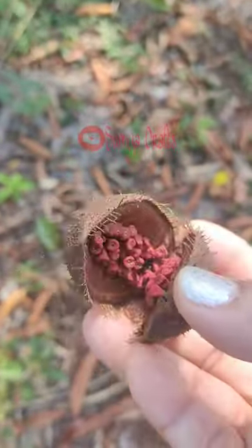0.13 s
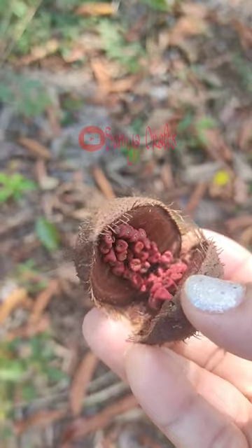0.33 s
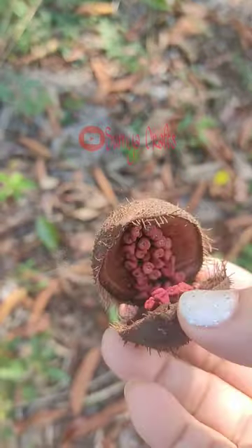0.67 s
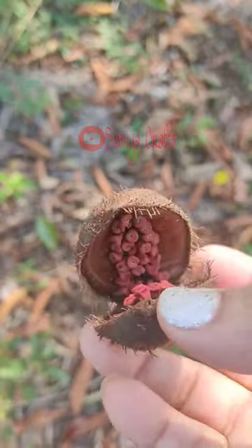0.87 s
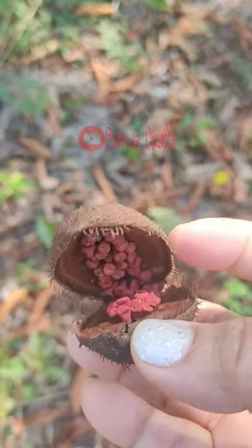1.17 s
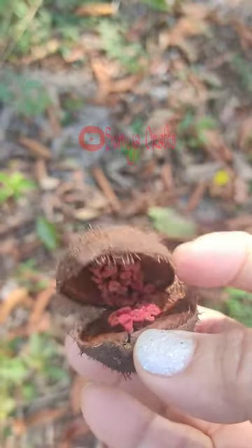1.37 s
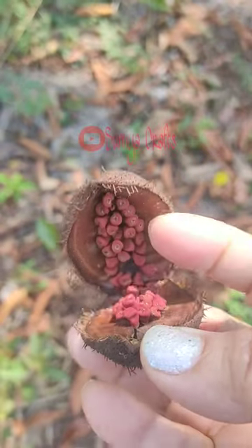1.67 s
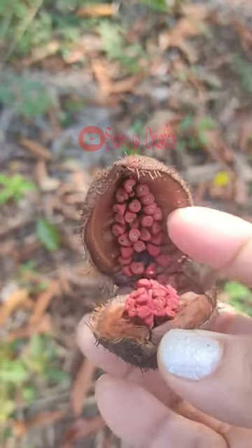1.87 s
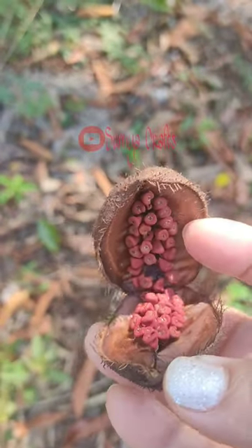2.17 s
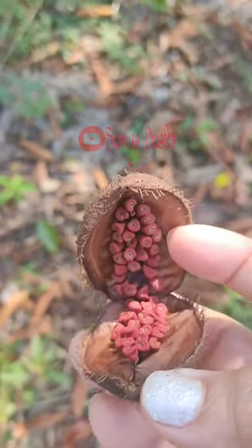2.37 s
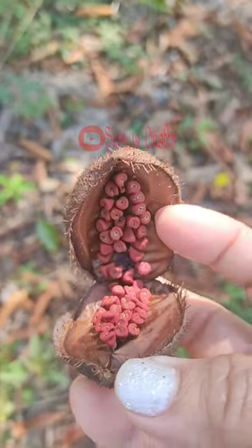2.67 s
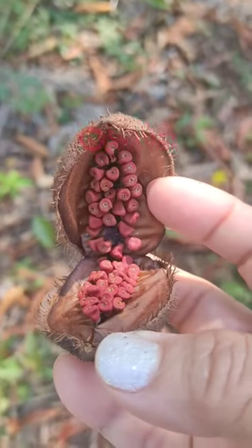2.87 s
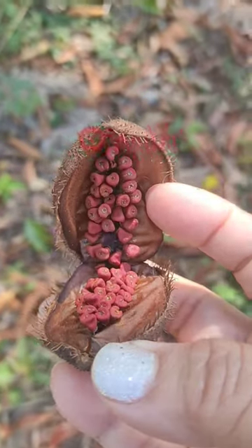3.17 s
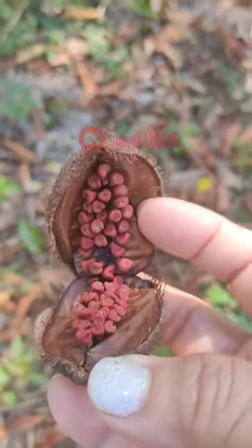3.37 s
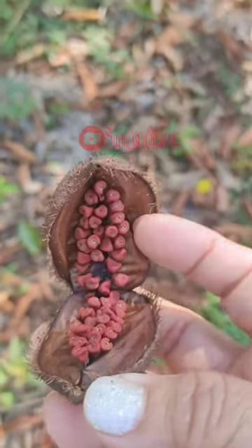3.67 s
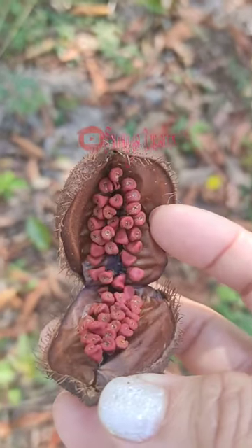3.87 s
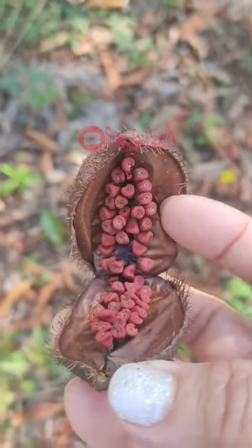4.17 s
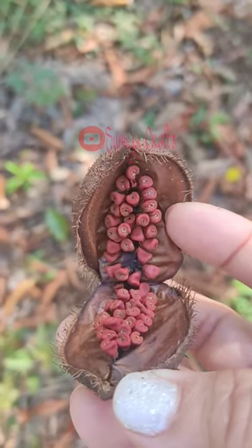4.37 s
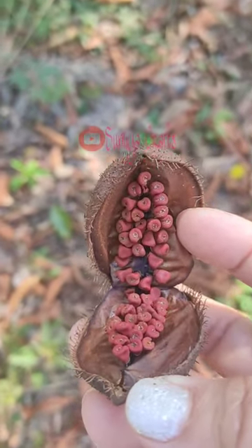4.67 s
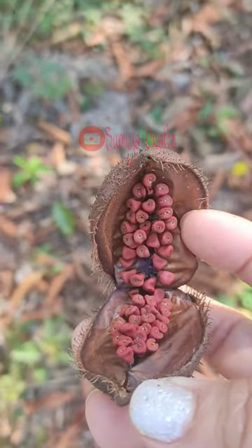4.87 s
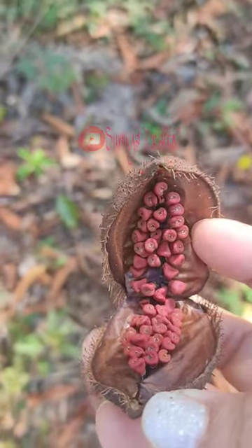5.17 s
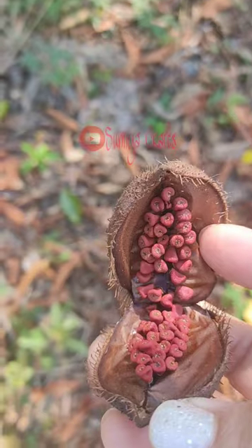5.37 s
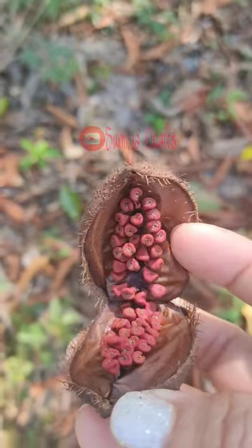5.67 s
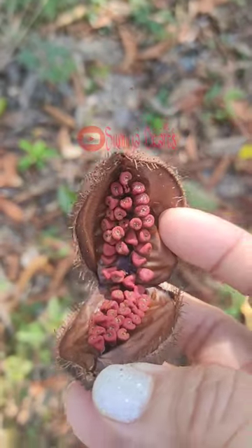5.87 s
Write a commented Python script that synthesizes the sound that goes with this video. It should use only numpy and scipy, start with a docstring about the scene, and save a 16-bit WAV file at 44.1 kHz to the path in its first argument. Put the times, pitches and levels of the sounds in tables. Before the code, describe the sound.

A steady, high cricket trill and a soft hiss fill an outdoor spot. Right by the microphone, a dry seed pod is pulled apart by hand, its shell crackling and scraping in irregular bursts that peak in one sharp crack. In the second half there is only light rubbing and the odd click. A far cicada buzzes faintly, and a bird pipes once, thinly, about halfway through.

```python
"""Outdoors, fingers pry open a dry, bristly seed pod close to a phone's two microphone ports.
Breaking fibres crack and stick-slip friction scrapes; both excite the modes of the shell's hollow body,
wall, rim and bristles. Crickets trill high all around by stridulation, a far cicada swells and a bird
pipes once. Faint low tones and a few puffs of air come and go over a steady background hiss."""
import sys
import numpy as np
from scipy import signal
from scipy.io import wavfile
from scipy.ndimage import uniform_filter1d

SR = 44100
rng = np.random.default_rng(int(sys.argv[2]) if len(sys.argv) > 2 else 0)


def materialize(psi):
    """Save the field psi as 16-bit PCM at rate SR to the path in sys.argv[1].

    A 1-D psi becomes a single channel; in a 2-D psi each row is a channel.
    """
    bounded = np.clip(np.atleast_2d(psi).T, -1, 1)
    quanta = np.round(bounded * 32767).astype(np.int16)
    wavfile.write(sys.argv[1], SR, quanta)


N = 265482

# steady background hiss at each port, cut off near 15.5 kHz: frequency_hz, relative_density_db
HISS_LEFT = [(15, 3.5), (40, -8), (60, -17), (110, -19.5), (170, -12.5), (600, -17), (1500, -21),
             (4000, -28.5), (9000, -20), (10500, -29.5), (15200, -32.5), (15700, -68)]
HISS_RIGHT = [(15, 1), (40, -17), (110, -22), (170, -18), (600, -25), (1500, -25), (4000, -24.5),
              (9000, -27), (10500, -32), (15200, -29), (15700, -71)]
# likeness of the hiss at the two ports: frequency_hz, correlation
HISS_COHERENCE = [(300, 0.38), (1000, 0.065)]
# puffs of air: peak_s, level_db, sigma_s
PUFFS = [(3.54, -61.5, 0.043), (3.6, -51.5, 0.011), (3.771, -57.5, 0.017)]
# sinking low tone: time_s, level_db, pitch_hz
DRONE_CURVE = [(1.22, -95, 465), (1.33, -74.5, 427), (1.46, -72, 386), (1.52, -100, 375)]
# low hum and far cicada: time_s, level_db
HUM_CURVE = [(0, -74), (1.05, -73.5), (1.3, -103), (5.2, -105), (5.5, -73.5), (6.02, -70)]
CICADA_CURVE = [(0, -73), (.4, -65.5), (1.1, -67.5), (2.35, -69.5), (2.9, -85), (3.3, -69.5), (3.7, -73.5),
                (4.2, -90)]
# bird's note: time_s, level_db, pitch_hz
BIRD_CURVE = [(3.185, -80, 2550), (3.2, -61, 2545), (3.288, -62, 2465), (3.308, -73, 2440),
              (3.335, -60, 2405), (3.385, -76, 2330)]
# single crickets: pitch_hz, pulse_rate_hz, relative_level_db, left_minus_right_db
CRICKETS = [(6990, 98, -8.5, -23), (6930, 52, -8, -8.5), (7237, 59, 2.5, 7.5), (6740, 52, -6, 5),
            (7320, 110, -15, -22), (7000, 64, -4.5, 2.5), (6900, 50, -6.5, -14.5)]
# their whole chorus: time_s, relative_level_db, left_minus_right_db
CHORUS_CURVE = [(0.0, -56, -2), (3.15, -56, -4.5), (3.57, -57.5, -2.5), (4.27, -56, -6), (4.58, -57, -5.5),
                (6.02, -57, -4)]
# modes of the shell's four parts and of the air inside: frequency_hz, width_hz, relative_level_db
BODY_MODES = [(1314, 860, 0)]
WALL_MODES = [(1970, 470, -5.5), (2830, 544, 9.5), (3915, 840, -0.5)]
RIM_MODES = [(5750, 1360, -2.5), (6850, 960, 4), (8640, 3800, 1.5)]
BRISTLE_MODES = [(8755, 980, 15), (11070, 760, -8), (14100, 1800, -7)]
CAVITY_MODES = [(2880, 260, 0)]
# directivity of body, wall, rim and bristles: left_minus_right_db
PART_PAN_DB = [0.5, 5, -6.5, 5.5]
# the hands carry the pod from the left to the middle: time_s, left_minus_right_db
POD_PATH = [(0, 7), (1.7, 7), (2.2, 2.5), (2.7, 4.5), (4.3, -2), (6.02, 1)]
# finger strokes: firmest_s, rise_s, fall_s, relative_wall_db, relative_rim_and_bristle_db
STROKES = [(.28, 0.49, 0.29, -74.5, -69), (.4, 0.086, 0.072, -67, -59), (0.655, 0.32, 0.16, -62, -57),
           (0.821, 0.11, 0.063, -56, -60), (1.198, 0.069, 0.43, -50.5, -45.5),
           (1.501, 0.085, 0.17, -47, -45), (1.66, 0.14, 0.087, -49, -43.5), (1.84, 1, 0.16, -56.5, -59.5),
           (2.07, 0.16, 0.24, -64.5, -61), (2.259, 0.071, 0.092, -58, -99), (2.52, 0.081, 0.16, -62, -68),
           (2.629, 0.089, 0.1, -64, -52.5), (2.9, 0.99, 0.3, -74.5, -65.5),
           (3.24, 0.32, 0.38, -67.5, -59.5), (3.86, 0.28, 0.52, -70, -61.5),
           (4.06, 0.22, 0.23, -68.5, -55.5), (4.319, 0.52, 0.17, -69.5, -60),
           (4.54, 0.49, 0.43, -66.5, -54), (4.84, 0.59, 0.092, -70.5, -58.5),
           (5.019, 0.48, 0.75, -73.5, -59), (5.5, 1, 0.98, -82.5, -65), (6.02, 0.3, .1, -70, -61)]
# fractures, each level being energy spread over 1 ms:
# peak_s, wall_pitch_hz, rim_pitch_hz, wall_db, rim_db, bristle_db, length_ms (capped at 10 when played)
CRACKS = [(0.258, 2700, 6260, -41, -43, -45, 1.2), (0.2632, 2520, 6040, -43.5, -38, -48, 1.36),
          (0.3014, 2520, 6200, -45, -45, -58, 1.8), (0.3595, 2780, 7000, -55, -52, -45, 1.66),
          (.39, 2800, 7600, -57, -50, -50, 1.6), (0.5131, 3170, 7400, -49, -35, -47, 0.82),
          (0.528, 2780, 6550, -39.5, -45, -62, 7.6), (0.697, 2800, 7600, -63, -50, -45, 1.2),
          (0.7352, 2750, 5600, -58, -42, -39, 1.7), (0.7386, 3030, 7100, -45, -41, -39.5, 1.2),
          (0.7478, 2660, 6760, -45, -38, -39.5, 3.2), (.808, 2760, 6500, -38, -61, -56, 1.9),
          (0.8173, 2810, 6500, -44, -55, -48, 5.1), (0.8233, 2880, 6500, -38, -51, -48, 2.8),
          (0.8294, 2860, 7050, -36, -36.5, -40.5, 8.1), (0.8367, 2600, 7250, -44, -40, -42, 3.6),
          (0.933, 2560, 6400, -48, -45, -54, 5.5), (0.992, 2710, 6500, -45, -57, -56, 2.3),
          (1.1045, 3140, 7340, -44, -38.5, -40.5, 0.78), (1.1823, 2620, 6900, -40.5, -36, -50, 5.4),
          (1.19, 2670, 5050, -32, -33.5, -42, 4.1), (1.21, 2980, 5650, -34.5, -35, -34, 0.96),
          (1.2175, 2830, 5340, -33, -20, -26, 2.33), (1.222, 2570, 5340, -56, -28.5, -37, 0.92),
          (1.233, 2880, 4400, -32, -33.5, -43, 2.7), (1.2536, 2210, 7600, -49, -46, -34, 1.93),
          (1.2615, 2530, 7700, -47, -32, -41, 2.04), (1.408, 3430, 6860, -40.5, -45, -46, 3.1),
          (1.417, 2770, 7000, -62, -45, -40.5, 5.7), (1.4702, 2580, 4450, -26, -37, -44, 4.7),
          (1.4738, 2100, 6260, -34.5, -34, -49, 2.2), (1.4836, 2440, 7640, -38, -34, -27.5, 2.06),
          (1.487, 2900, 6500, -28.5, -42, -37, 2.8), (1.4907, 2340, 7040, -32, -33, -49, 3.3),
          (1.4964, 2550, 7800, -33, -39, -48, 6.2), (1.5336, 2750, 6900, -30, -30.5, -43, 2.6),
          (1.618, 3170, 4430, -34, -56, -38, 2.6), (1.6279, 2300, 7700, -44.5, -38, -45, 1.85),
          (1.645, 2550, 7150, -46, -31.5, -42, 4), (1.6508, 2480, 7200, -31.5, -38, -52, 4.3),
          (1.66, 3370, 6800, -35, -37, -43, 2.4), (1.6665, 2830, 5300, -31.5, -38, -43, 2.7),
          (1.6943, 3160, 6250, -31.5, -26, -31.5, 2.5), (1.7202, 3400, 5900, -48, -37, -55, 0.67),
          (1.7242, 2110, 4500, -44.5, -42, -50, 1.6), (1.7535, 3730, 6200, -39, -21, -32, 0.61),
          (1.79, 3100, 6600, -46, -32, -39, 1.3), (1.7943, 2880, 7140, -39, -32, -43, 3.5),
          (1.808, 3500, 6200, -49, -31.5, -48, 0.93), (1.8186, 2320, 6500, -55, -34, -54, 1.3),
          (1.829, 2770, 7760, -32, -31, -27, 1.5), (1.838, 3600, 5800, -36, -28.5, -33, 2),
          (1.8518, 3150, 7240, -37.5, -29, -50, 2.9), (1.893, 3400, 6900, -50, -40, -43, 2.2),
          (1.9039, 2830, 6200, -29.5, -28, -51, 6.9), (1.938, 2910, 7460, -23, -32, -33, 1.514),
          (1.9808, 3300, 7160, -52, -38, -50, 1.26), (2.0316, 3870, 4630, -44, -33, -39, 2.2),
          (2.0356, 3520, 7100, -40, -29.5, -36, 1.8), (2.0534, 3770, 6800, -47, -23.5, -41, 0.58),
          (2.067, 2920, 6500, -34.5, -40, -37, 12), (2.1294, 2200, 7150, -45.5, -35, -43, 1.46),
          (2.2084, 3700, 6050, -39, -26, -46, 0.36), (2.2112, 3600, 6140, -42, -28, -41, 1.5),
          (2.2257, 3840, 6200, -29, -15.5, -35, 1.07), (2.228, 3060, 7100, -23, -14, -18, 1.2),
          (2.23, 3400, 4930, -19.5, -13, -15, 2.6), (2.234, 2730, 7100, -15, -13, -27, 1.52),
          (2.2373, 2860, 6000, -25, -34, -26, 1), (2.2399, 3300, 7360, -36, -17, -35, 0.66),
          (2.2429, 2770, 6500, -26, -28, -38, 3.1), (2.2467, 2700, 7050, -30, -34, -36, 2.2),
          (2.2683, 3500, 7260, -48, -20.5, -41, 1), (2.276, 2650, 7760, -24.5, -33, -18, 1.72),
          (2.28, 3200, 4400, -28, -33, -39, 7.1), (2.2863, 3800, 4370, -35, -39, -55, 1.77),
          (2.4206, 3220, 6900, -63, -42, -56, 0.65), (2.4576, 2770, 6430, -34, -43, -54, 2.97),
          (2.483, 2860, 6500, -41, -43, -44, 3.7), (2.5065, 2660, 7600, -42, -32.5, -30.5, 1.04),
          (2.5329, 3720, 7200, -33, -32, -38, 4), (2.541, 3750, 4500, -35.5, -46, -38, 4.5),
          (2.5475, 3970, 5920, -37, -28.5, -38, 1.66), (2.597, 3900, 5000, -28, -21.5, -28.5, 3.4),
          (2.6036, 3650, 5240, -34, -26.5, -30, 1.8), (2.614, 2600, 7200, -43, -34, -45, 2),
          (2.6377, 3080, 7760, -39, -43, -50, 5), (2.6519, 3540, 7200, -33, -32, -33, 1.7),
          (2.6566, 2860, 7200, -35, -26, -49, 1.65), (2.6598, 2940, 7860, -29.5, -39, -19.5, 1.07),
          (2.6612, 2700, 7800, -29, -35, -25, 1.7), (2.692, 3200, 4300, -26.5, -46, -41, 6.3),
          (2.723, 3400, 7700, -52, -51, -32, 1.7), (2.759, 2490, 6500, -44.5, -43, -46, 5.2),
          (2.9551, 3070, 4000, -37, -28, -30, 1.6), (3.0685, 3040, 6700, -73, -36.5, -60, 6.4),
          (3.1836, 3900, 5400, -43, -40, -30, 0.71), (3.7377, 2970, 4840, -32, -44, -52, 5),
          (4.0847, 3340, 7050, -66, -33, -48, 2.35), (4.0908, 3300, 7160, -62, -43, -43, 2.5),
          (4.543, 3360, 6400, -60, -36, -60, 4.3), (4.821, 3220, 7100, -49, -39, -54, 4.5),
          (5.924, 3930, 6100, -39.5, -32.5, -58, 0.84), (5.927, 3950, 5900, -39.5, -44, -52, 7.9),
          (5.975, 3880, 5170, -32, -35, -34, .9)]

PORT_LAG_S = .00016  # the pod is nearer to the right port
HISS_DB, HUM_HZ, CICADA_HZ = -58.5, 682, 2944
WALL_HZ, RIM_HZ, CAVITY_DB = 2750, 6700, -10  # unscaled pitches; cavity level relative to the wall
WOOD_TOP_HZ = 9300  # wall and rim are too thick to ring above this
STROKE_RANGE_DB = 42  # a stroke grows and fades by this much over its rise and fall
MAIN_FIBRE, RING_UP_S = 6, .0003  # weight of a crack's strongest fibre; time the shell takes to ring up
JOLT_DB, JOLT_S = -33, .0005  # each crack brings a low thump: level relative to the wall, time constant


def amp(db):
    return 10 ** (np.asarray(db) / 20)


def unit_rms(x):
    return x / np.sqrt(np.mean(x ** 2) + 1e-20)


def norm(x):
    return np.linalg.norm(x, axis=-1, keepdims=True)


def pan(left_minus_right_db):
    """Interchannel level difference: left and right gains, one row each."""
    return amp([left_minus_right_db / 2, -left_minus_right_db / 2]).reshape(2, -1)


def lagged(x, lag_s):
    return np.roll(x, round(lag_s * SR))


def at_frequencies(rows, hz):
    """Interpolation along a logarithmic frequency axis."""
    row_hz, values = np.transpose(rows)
    return np.interp(np.log(hz + 1), np.log(row_hz + 1), values)


def follow(rows):
    """Linear interpolation of each column in time, one value a sample."""
    time_s, *columns = np.transpose(rows)
    return [np.interp(np.arange(N) / SR, time_s, column) for column in columns]


def drift(rate_hz):
    """Random modulation: a smooth curve through Gaussian values, two a cycle."""
    knots = rng.standard_normal(8000)
    position = np.arange(N) / SR * rate_hz * 2
    below = position.astype(int)
    blend = (position - below) ** 2 * (3 - 2 * (position - below))
    return knots[below] * (1 - blend) + knots[below + 1] * blend


def resonate(x, hz, width_hz):
    """Resonance of gain 1 by heterodyning: shift hz down to zero, smooth, shift back."""
    carrier = np.exp(2j * np.pi * np.cumsum(hz * np.ones(x.shape[-1])) / SR)
    pole = np.exp(-np.pi * width_hz / SR)
    return 2 * (carrier * signal.lfilter([1 - pole], [1, -pole], x / carrier)).real


def background_hiss():
    """Partially coherent noise: a hiss whose level drifts in patches of time and frequency."""
    frames, hz = N // 256 + 5, np.fft.rfftfreq(1024, 1 / SR)
    left_re, left_im, own_re, own_im, patches = rng.standard_normal((frames, 513, 5)).T
    patches = unit_rms(uniform_filter1d(uniform_filter1d(patches, 8, 0), 8, 1))
    patches_db = np.clip(hz / 800, 1, 3.5)[:, None] * patches  # the bass is steadier
    coherence = at_frequencies(HISS_COHERENCE, hz)[:, None]
    left = left_re + 1j * left_im
    right = coherence * left + np.sqrt(1 - coherence ** 2) * (own_re + 1j * own_im)
    density_db = np.array([at_frequencies(HISS_LEFT, hz), at_frequencies(HISS_RIGHT, hz)])
    spectra = np.array([left, right]) * amp(density_db[:, :, None] + patches_db)
    return amp(HISS_DB) * unit_rms(signal.istft(spectra, nperseg=1024, noverlap=768)[1][:, :N])


def air_puffs():
    """Pressure fluctuation, mostly at the left port: low noise under Gaussian envelopes."""
    t = np.arange(N) / SR
    envelope = sum(amp(db) * np.exp(-.5 * ((t - peak_s) / sigma_s) ** 2) for peak_s, db, sigma_s in PUFFS)
    return envelope * unit_rms(resonate(rng.standard_normal(N), hz=260, width_hz=190)) * [[1], [.15]]


def drone():
    """Noise through a narrow, falling resonance: a faint, fuzzy low tone on the left."""
    level_db, hz = follow(DRONE_CURVE)
    tone = resonate(resonate(rng.standard_normal(N), hz, width_hz=25), hz, width_hz=35)
    return pan(23) * amp(level_db) * unit_rms(tone)


def hum():
    """Narrowband noise, heard as a wavering low pitch that comes and goes."""
    band = signal.firwin(2001, [HUM_HZ - 40, HUM_HZ + 40], pass_zero=False, fs=SR)
    tone = signal.oaconvolve(rng.standard_normal((2, N)), band[None], "same")
    return amp(follow(HUM_CURVE)[0] + 1.5 * drift(13)) * pan(7.6) * unit_rms(tone)


def cicada():
    """Amplitude modulation of a resonant noise band: a far buzz, partly coherent between the ports."""
    common, own = rng.standard_normal((2, N))
    noise = np.array([lagged(common, PORT_LAG_S), .7 * common + .7 * own])
    buzz = resonate(resonate(noise, CICADA_HZ, width_hz=450), CICADA_HZ, width_hz=550)
    return amp(follow(CICADA_CURVE)[0] + 5 * drift(26)) * pan(12.2) * unit_rms(buzz)


def bird():
    """A thin falling whistle, roughened by random modulation and reflections from the trees."""
    level_db, hz = follow(BIRD_CURVE)
    jitter = np.clip((2480 - hz) / 5000, .003, 1)  # the voice wavers more as it sinks
    phase = 2 * np.pi * np.cumsum(hz * (1 + jitter * drift(150))) / SR
    note = amp(level_db + 1.5 * drift(40)) * np.sin(phase)
    note[:round(BIRD_CURVE[0][0] * SR)] = note[round(BIRD_CURVE[-1][0] * SR):] = 0
    trees = rng.standard_normal((2, 3000)) * np.exp(-np.arange(3000) / SR / .025) / 60
    return pan(9) * (note + signal.oaconvolve(note[None], trees, axes=1)[:, :N])


def crickets():
    """Stridulation: each wing closure gives a tone pulse; scattering by leaves blurs the pulses."""
    direct = np.zeros((2, N))
    for hz, rate_hz, level_db, pan_db in CRICKETS:
        wing_cycle = (np.cumsum(rate_hz * (1 + .03 * drift(8))) / SR + rng.random()) % 1
        pulses = np.sin(np.pi * np.clip(wing_cycle / .6, 0, 1)) ** 2
        sagging_hz = hz * (1 + .015 * (.3 - wing_cycle) + .004186 * drift(153.7))
        song = pulses * np.sin(2 * np.pi * np.cumsum(sagging_hz) / SR) * amp(level_db + 2 * drift(7.2))
        direct += pan(pan_db) * [lagged(song, PORT_LAG_S * rng.uniform(-1.007, 1)), song]
    leaves = rng.standard_normal((2, 6000)) * amp(-60 * np.arange(6000) / SR / .15)  # 60 dB in 0.15 s
    scattered = signal.fftconvolve(direct, leaves, axes=1)[:, :N]
    chorus = unit_rms(unit_rms(direct) + amp(-1.5) * unit_rms(scattered))
    level_db, pan_db = follow(CHORUS_CURVE)
    return amp(level_db + 5) * pan(pan_db) * chorus


def ring(modes, pitch_ratio=1):
    """Modal superposition: one part's impulse response, of energy 1, each mode starting softly."""
    t = np.arange(400) / SR * pitch_ratio  # smaller pieces ring higher and shorter
    response = 0
    for k, (hz, width_hz, db) in enumerate(modes):
        envelope = (width_hz * t) ** 2 * np.sqrt(width_hz) * np.exp(-2 * np.pi * width_hz * t)
        # neighbouring modes swing in opposite senses, which fills the gap between them
        response += (-1) ** k * amp(db) * envelope * np.cos(2 * np.pi * hz * t)
    response = signal.lfilter(*signal.butter(4, 560, "high", fs=SR), response)  # no net air is moved
    return response / norm(response)


def shell(wall_ratio, rim_ratio):
    """Directional radiation of body, wall, rim and bristles: responses as parts x ports x samples."""
    wall = ring(WALL_MODES, wall_ratio) + amp(CAVITY_DB) * ring(CAVITY_MODES)  # the air inside rings on
    wood = [ring(BODY_MODES), wall, -ring(RIM_MODES, rim_ratio)]
    wood = signal.lfilter(*signal.butter(5, WOOD_TOP_HZ, fs=SR), wood)
    responses = np.array([*wood, ring(BRISTLE_MODES)])
    return responses[:, None] * pan(np.array(PART_PAN_DB)).T[:, :, None]


def stroke_levels():
    """Incoherent addition: swelling and fading finger strokes sum in power to wall and rim levels in dB."""
    t, power = np.arange(N) / SR, 1e-11
    for firmest_s, rise_s, fall_s, wall_db, rim_db in STROKES:
        fade = np.where(t < firmest_s, (firmest_s - t) / rise_s, (t - firmest_s) / fall_s)
        power = power + amp(np.array([[wall_db], [rim_db]]) - STROKE_RANGE_DB * fade) ** 2
    return 10 * np.log10(power)


def scraping():
    """Stick-slip friction: bristles catch and let go in clumps of tiny snaps that drive the shell."""
    wall_db, rim_db = stroke_levels()
    # firm rubbing is coarser than a light touch
    coarseness = np.clip(np.maximum(wall_db + 76.5, rim_db + 70) / 20, 0, 1)
    clumps_db = coarseness * 3 * np.clip(drift(120), -3, 1.6)
    # each part is also caught at its own moments
    catches_db = coarseness * 4 * np.clip([drift(70) for _ in PART_PAN_DB], -3, 1.6)
    snaps_per_s = 1600 + 6000 * (1 - coarseness)
    sizes = amp(3 * np.minimum(rng.exponential(1, (2, N)), 3))
    slips = rng.random((2, N)) * SR < snaps_per_s
    common, own = unit_rms(sizes * slips * rng.standard_normal((2, N))) * amp(clumps_db)
    snaps = np.array([lagged(common, PORT_LAG_S), .5 * common + 1.1 * own]) * pan(follow(POD_PATH)[0])
    snaps = signal.oaconvolve(snaps, signal.firwin(101, 15300, fs=SR)[None], "same")
    body_db = wall_db + .5 + .025 * (wall_db + 85)  # the body answers more to hard rubbing
    parts_db = np.array([body_db, wall_db + 10.5, rim_db + 3.5, rim_db + 3])
    drive = amp(parts_db + catches_db)[:, None] * snaps
    responses = shell(wall_ratio=.98, rim_ratio=.88)  # the rubbed rim rings lower than a broken piece
    return signal.oaconvolve(drive, responses, axes=2)[:, :, :N].sum(0)


def fibre_burst(length_s, noises):
    """Acoustic emission: breaking fibres, one main snap and a crumbling tail; energy of 1 ms at rms 1."""
    common, own, unevenness, crumbs = noises
    t = np.arange(len(common)) / SR
    progress = 4 * t / length_s  # the tear peaks half way through its length
    tear = 2 * progress ** 2 * np.exp(-progress)
    tail = .045 * np.exp(-t / .006) * np.minimum(progress / 2, 1) * crumbs ** 2
    envelope = (tear + tail) * amp(1.5 * unevenness)
    snap = MAIN_FIBRE * np.sign(common[0]) * signal.unit_impulse(len(t), round(length_s / 2 * SR))
    left = lagged(envelope * common + snap, PORT_LAG_S)
    right = envelope * (.51 * common + .99 * own) + snap
    burst = np.array([left, right])
    return burst * np.sqrt(SR / 1000) / norm(burst)


def cracks():
    """Brittle fracture: each burst of fibres excites the shell's modes, with a low thump beneath it."""
    out, t = np.zeros((2, N + 2000)), np.arange(400) / SR
    pod_pan_db, = follow(POD_PATH)
    jolt = t * np.exp(-t / JOLT_S)
    for peak_s, wall_hz, rim_hz, wall_db, rim_db, bristle_db, length_ms in CRACKS:
        length_s = min(length_ms, 10) / 1000
        noises = rng.standard_normal((4, 800))
        scatter_db = 2 * noises[3, 0]
        burst = fibre_burst(length_s, noises) * pan(pod_pan_db[round(peak_s * SR)] + scatter_db)
        wall_ratio = wall_hz / WALL_HZ
        # large pieces and slow tears shake the hollow body
        body_db = .8 * wall_db - 27 - min(164 * np.log10(wall_ratio), 15) + 1500 * length_s
        responses = shell(wall_ratio, rim_hz / RIM_HZ)
        parts = signal.fftconvolve(burst[None], responses, axes=2)
        parts *= norm(burst) * norm(responses) / norm(parts)  # each part takes its share of the energy
        sound = np.tensordot(amp([body_db, wall_db, rim_db, bristle_db]), parts, axes=1)
        sound += signal.fftconvolve(burst, amp(wall_db + JOLT_DB) * jolt[None] / norm(jolt), axes=1)
        start = round((peak_s - length_s / 2 - RING_UP_S) * SR)
        out[:, start:start + sound.shape[1]] += sound
    return out[:, :N]


def scene():
    """Linear superposition of all sources at the two ports."""
    return (cracks() + scraping() + crickets() + cicada() + hum() + bird()
            + air_puffs() + background_hiss() + drone())


def record(dry):
    """Band limiting: a linear-phase low-pass at 16.5 kHz."""
    return signal.oaconvolve(dry, signal.firwin(511, 16500, window=("kaiser", 9), fs=SR)[None], "same")


dry = scene()
out = record(dry)
materialize(out)
```